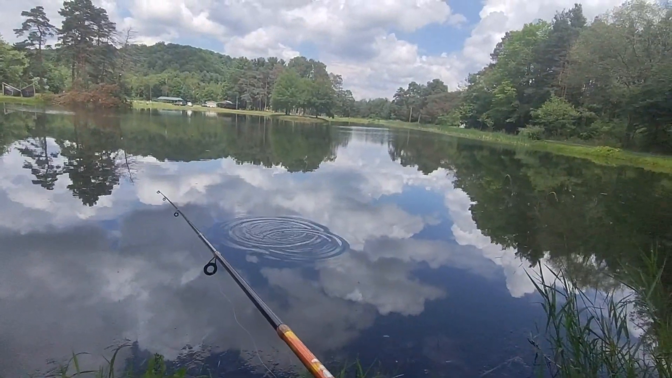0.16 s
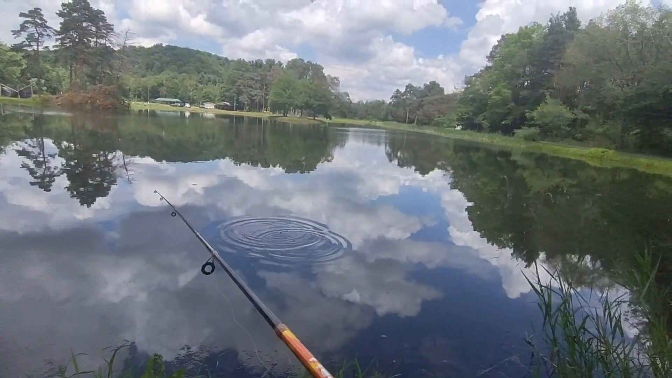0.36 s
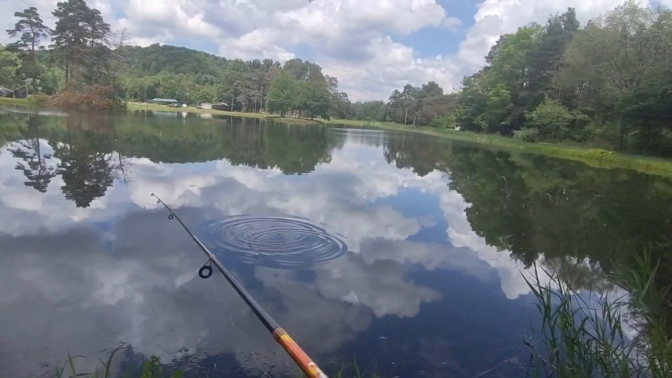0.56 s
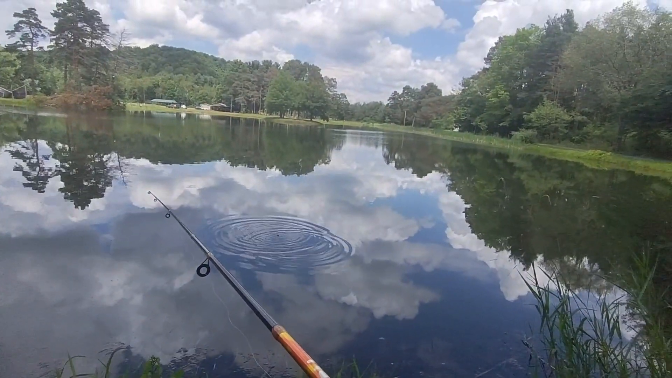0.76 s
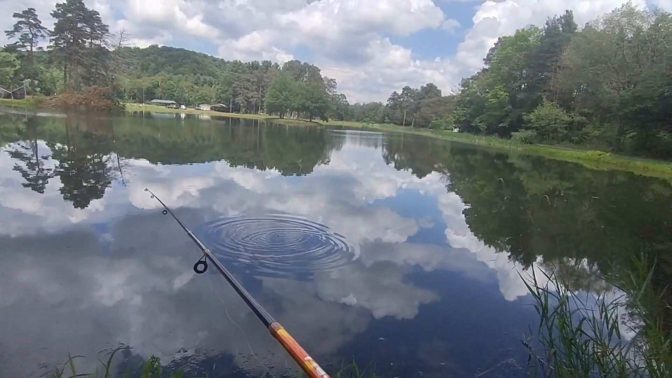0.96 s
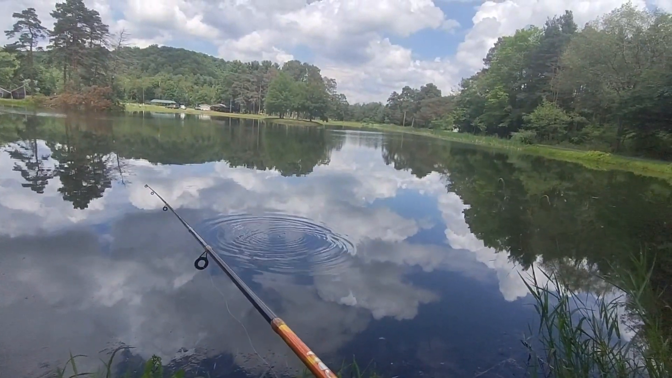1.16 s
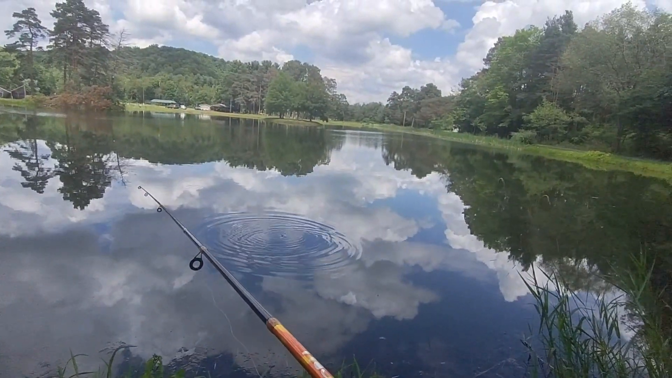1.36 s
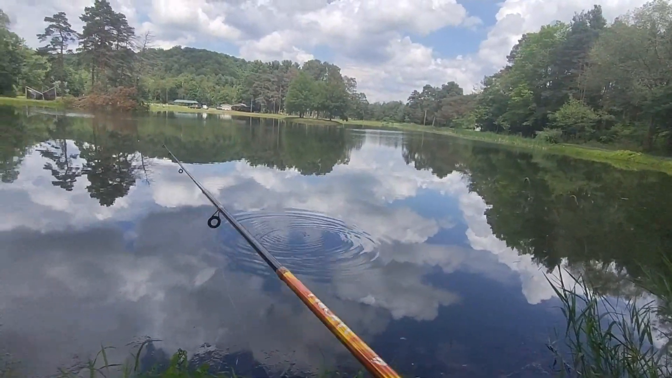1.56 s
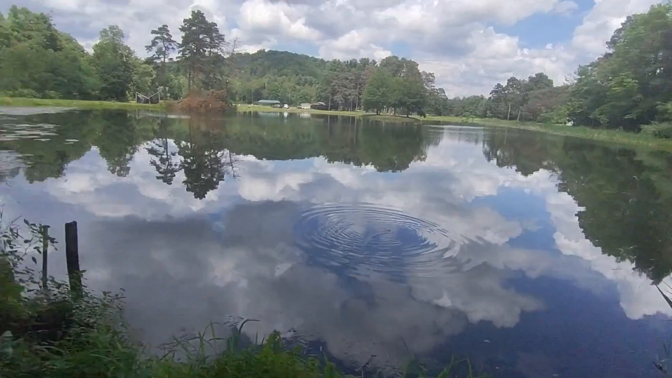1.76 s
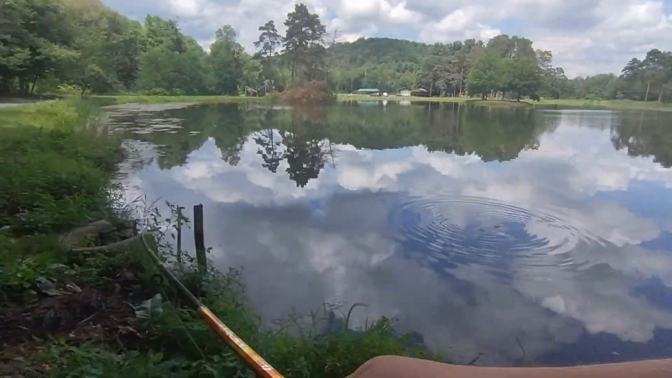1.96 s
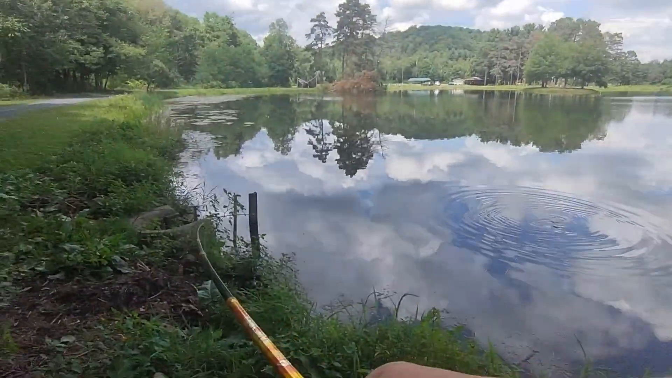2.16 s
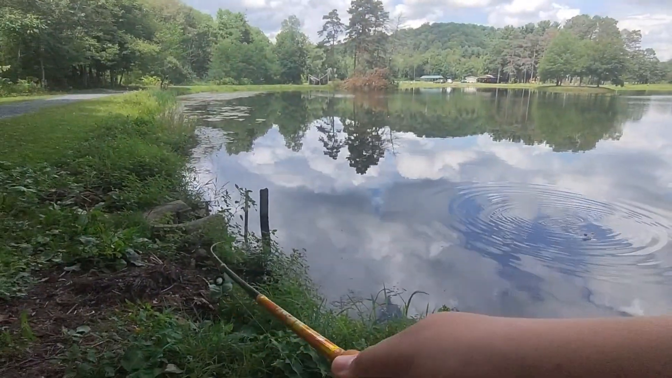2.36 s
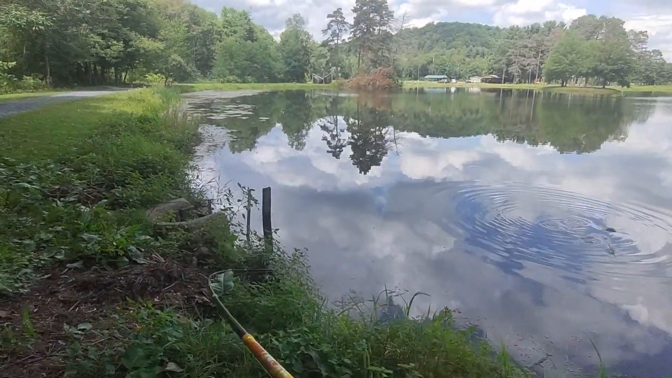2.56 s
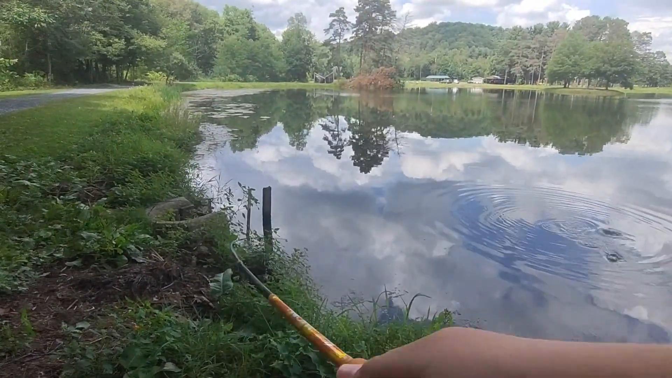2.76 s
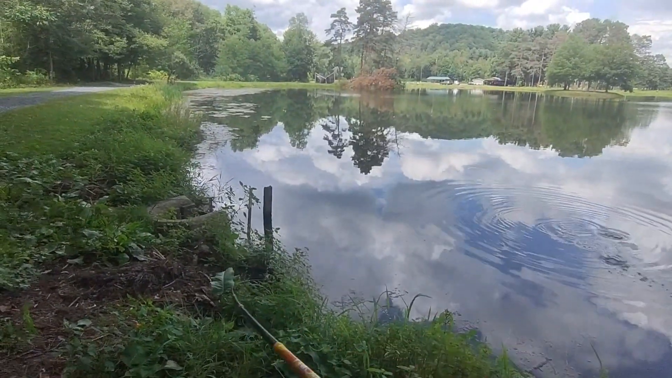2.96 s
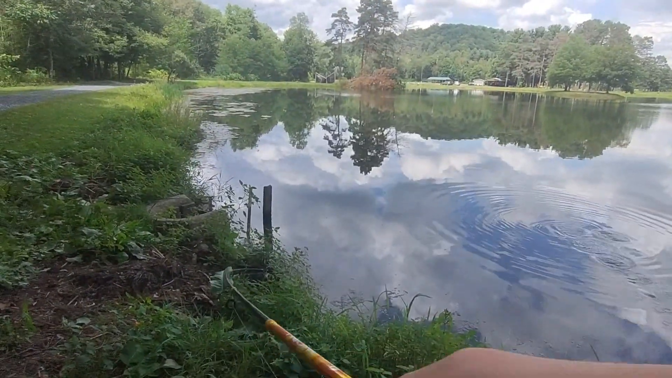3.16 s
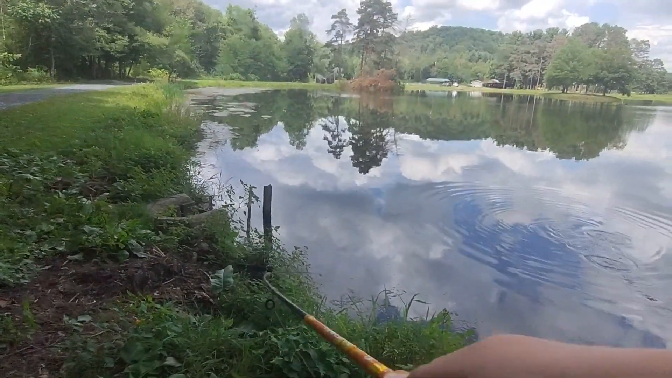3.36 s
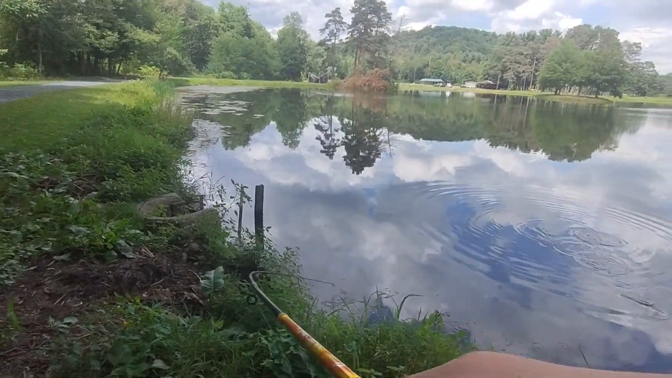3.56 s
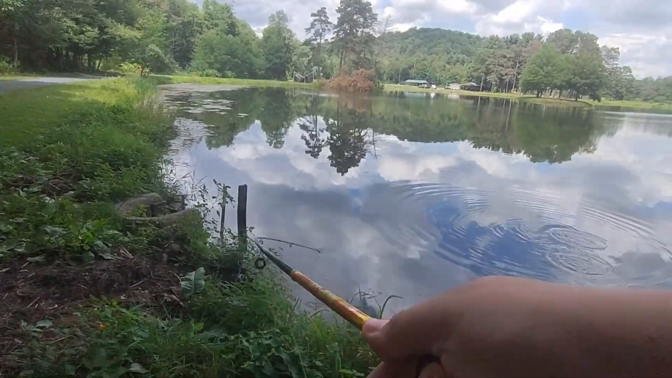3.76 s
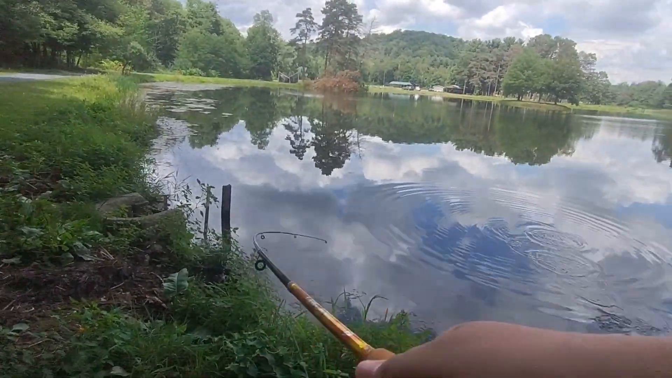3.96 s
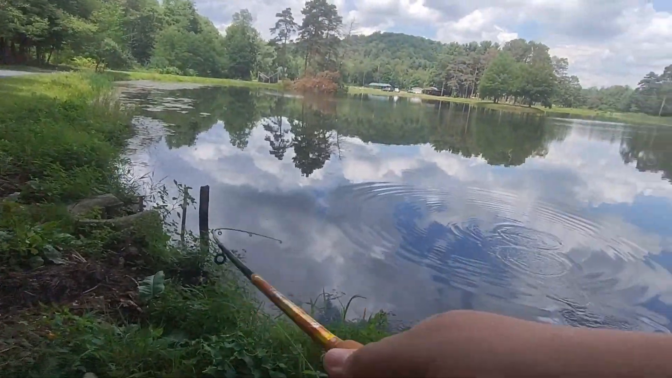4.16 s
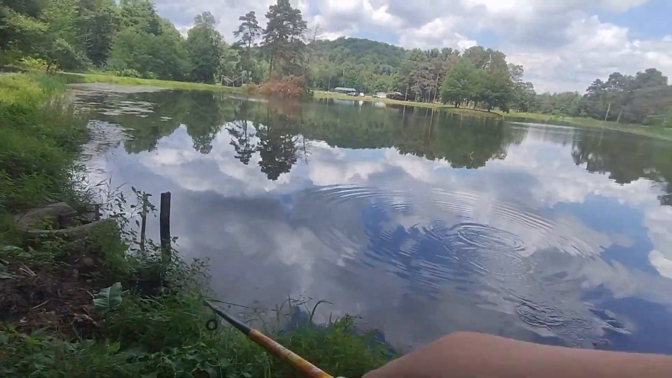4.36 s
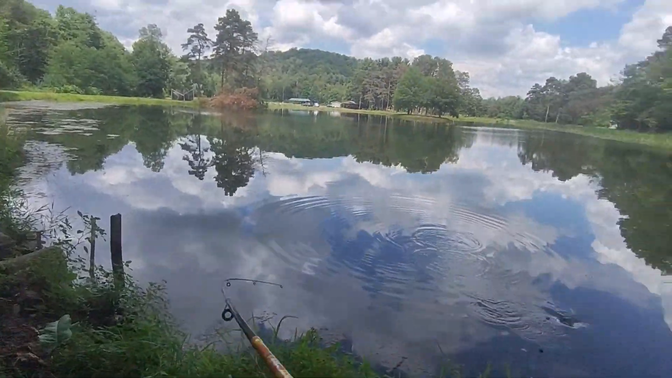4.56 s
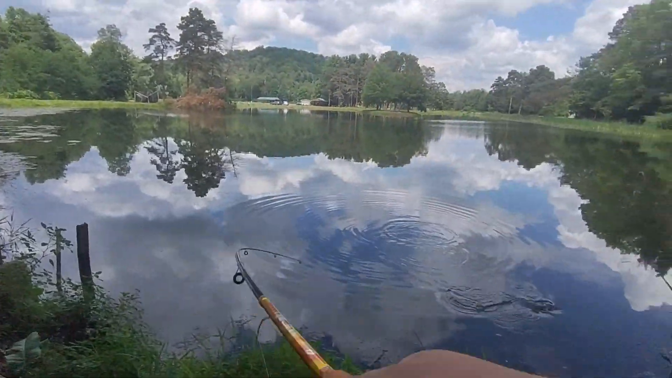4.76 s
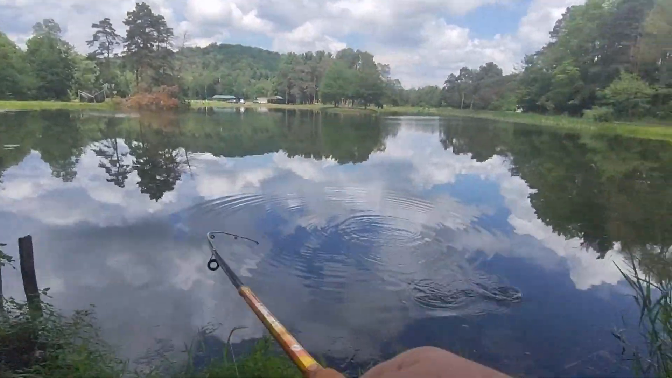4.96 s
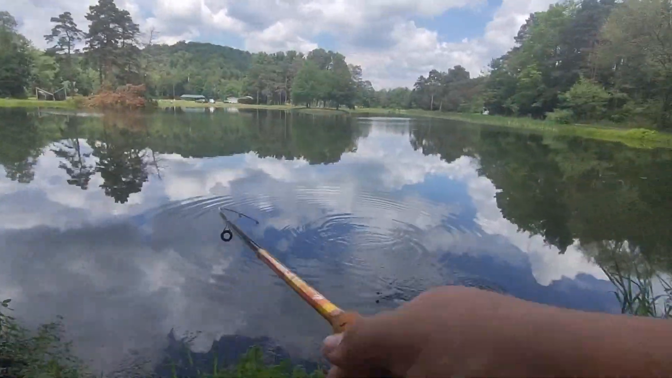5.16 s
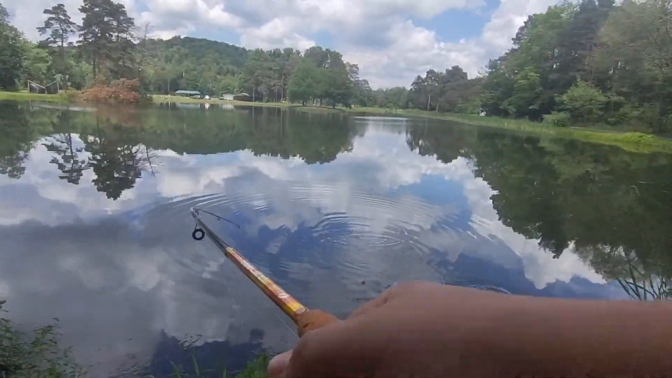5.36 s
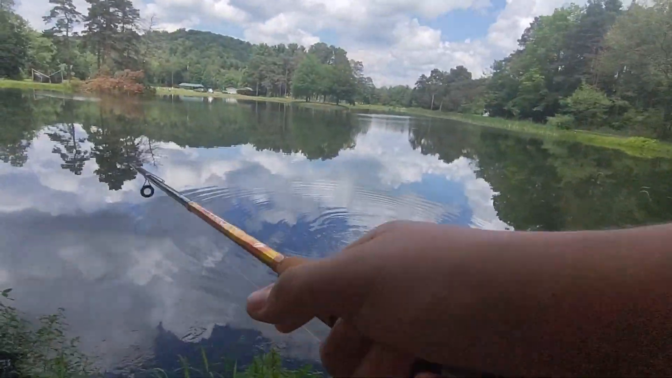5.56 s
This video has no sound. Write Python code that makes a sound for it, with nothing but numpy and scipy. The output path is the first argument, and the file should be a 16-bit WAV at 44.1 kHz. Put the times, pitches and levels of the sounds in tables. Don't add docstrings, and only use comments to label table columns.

```python
import sys
import numpy as np
from scipy import signal
from scipy.fft import rfft, irfft, next_fast_len
from scipy.io import wavfile
from scipy.ndimage import uniform_filter1d, map_coordinates

SR = 44100
rng = np.random.default_rng(int(sys.argv[2]) if len(sys.argv) > 2 else 0)


def undo_db(level):
    steps = np.asarray(level, float) / 20
    return 10 ** steps


def put_to_file(sound):
    columns = np.atleast_2d(sound).T
    safe = np.clip(columns, -1, 1)
    whole_steps = np.round(safe * 32767)
    wavfile.write(sys.argv[1], SR, whole_steps.astype(np.int16))


N = 247401
T = np.arange(N) / SR


def unit(x):
    return x / np.sqrt(np.mean(x ** 2) + 1e-20)


def along(points, hz):
    f, v = np.transpose(points)
    return np.interp(np.log(hz + 1), np.log(f + 1), v)


def spectrum(points):
    return lambda hz: undo_db(along(points, hz))


def over_time(points):
    s, value = np.transpose(points)
    return np.interp(T, s, value)


def wobble(rate):
    coarse = T[::int(SR / rate / 40) + 1]
    knots = rng.standard_normal(int(N * rate / SR) + 4)
    return np.interp(T, coarse, map_coordinates(knots, [coarse * rate]))


def filtered(x, response):
    m = next_fast_len(x.shape[-1] + 2048)
    return irfft(rfft(x, m) * response(np.fft.rfftfreq(m, 1 / SR)), m)[..., :x.shape[-1]]


def modes(table):
    def response(f):
        total = 0
        for k, (c, w, db) in enumerate(table):
            total = total + (-1) ** k * undo_db(db) * 1j * f * w / (c * c - f * f + 1j * f * w)
        return total
    return response


def ports(pair):
    # pitch_hz, level_db
    left_over_right = [(60, 0), (99, -5), (160, -6), (270, -2.5), (450, -2), (740, 0), (1220, -0.5),
                       (2010, 0.5), (3330, -1), (5500, 0), (9080, 22.5), (15000, 13.5)]
    # pitch_hz, likeness (-1 to 1)
    likeness = [(60, 0.38), (180, 0.82), (550, 0.17), (1650, -0.099), (4970, -0.061), (15000, 0.33)]
    turn = lambda hz: np.arccos(np.clip(along(likeness, hz), -1, 1)) / 2
    mid, side = filtered(pair, lambda hz: np.array([np.cos(turn(hz)), np.sin(turn(hz))]))
    share = lambda hz: 1 / np.sqrt(1 + undo_db(np.array([[-2], [2]]) * along(left_over_right, hz)))
    both = filtered(np.array([mid + side, mid - side]), share)
    return both / np.std(both.mean(0))


def rush(response, patchy_db, grain_db=0.0):
    noise = rng.standard_normal((2, N)) * undo_db(grain_db * wobble(350))
    z = signal.stft(noise, nperseg=512)[2]
    field = uniform_filter1d(rng.standard_normal(z.shape[1:]), 5, 0)
    field = uniform_filter1d(field, 9, 1)
    patchy = signal.istft(z * undo_db(patchy_db * unit(field)), nperseg=512)[1][:, :N]
    return ports(filtered(patchy, response))


def place(starts, rows):
    at = np.round(starts * SR).astype(int)[:, None] + np.arange(rows.shape[1])
    return np.bincount(at.ravel(), rows.ravel(), N + SR)[:N]


def strokes(rows):
    s, length, db = np.transpose(rows)[:, :, None]
    return (undo_db(db) * np.exp(-np.abs((T - s) / (0.5 * length)) ** 1.37)).sum(0)


def distant_air():
    # pitch_hz, level_db (per Hz)
    air_tone = [(15, -47), (25, -42), (65, -9.5), (210, -7.5), (251, -8.5), (695, -14.5), (777, -10),
                (991, -15.5), (1210, -15), (2150, -10), (2690, -15.5), (3590, -7), (5000, -13.5),
                (6500, -20), (11000, -120)]
    # pitch_hz, width_hz, level_db
    engine = [(68.8, 7.2, 0)]
    # time_s, level_db
    air_level = [
        (0.0, -75.5),
        (1.64, -75),
        (2.22, -67),
        (3.23, -64.5),
        (4.3, -68.5),
        (5.34, -76),
        (5.61, -62),
    ]
    air = rush(spectrum(air_tone), patchy_db=1.5)
    air = air + undo_db(-11.0) * rush(modes(engine), patchy_db=2.5)
    return undo_db(over_time(air_level) + 9.5) * air


def overtones(turn):
    # middle_s, length_s, overtone (number), level_db
    gaps = [(1.75, .55, 46, -57), (2.5, .12, 37, -46), (2.45, .3, 42, -50), (2.25, .3, 46, -50),
            (2.78, .25, 44, -48), (3.02, .85, 42, -41), (2.95, .7, 38, -49), (3.12, .35, 37, -51),
            (3.12, .35, 40, -51), (3.15, .45, 48, -54), (3.68, .3, 43, -48), (3.7, .4, 42, -51),
            (3.7, .3, 40, -52), (4.2, .5, 44, -42), (4.1, .25, 47, -44), (4.13, .35, 40, -48),
            (4.15, .4, 42, -50), (4.15, .35, 38, -54), (4.82, .42, 35, -48), (4.85, .4, 36, -50),
            (4.78, .45, 38, -48), (4.8, .4, 40, -52), (4.78, .45, 44, -48), (4.75, .4, 47, -54),
            (4.8, .4, 34, -53), (5.21, .24, 42, -39), (5.2, .22, 44, -46), (5.2, .2, 41, -50),
            (5.44, .3, 41, -42), (5.5, .3, 42, -44), (5.45, .3, 44, -49), (5.3, .5, 43, -51)]
    right_db = -19.5
    out, flicker = np.zeros(N), wobble(12)
    for s, length, order, db in gaps:
        span = slice(int((s - length) * SR), int((s + length) * SR))
        swell = np.exp(-np.abs(2 * (T[span] - s) / length) ** 4)
        gain = undo_db(db + 3 + 1.5 * np.roll(flicker, rng.integers(N))[span])
        out[span] += swell * gain * np.cos(order * turn[span] + rng.uniform(0, 2 * np.pi))
    return out * undo_db([[0], [right_db]])


def far_chorus():
    # time_s, level_db
    chorus_level = [(0.0, -46), (0.6, -47), (1.6, -45.5), (2.4, -44), (2.7, -46.5), (4.5, -43.5),
                    (5.61, -44.5)]
    # pitch_hz, level_db (per Hz)
    chorus_tone = [(2650, -49), (4500, -23), (5660, -23), (6250, -12.5), (7240, -9), (8260, -3.5),
                   (8760, -6), (8890, -11), (10500, -20), (12100, -30.5), (13700, -21.5), (14500, -71)]
    hiss = rush(spectrum(chorus_tone), patchy_db=.7) * undo_db(1.1 * wobble(11))
    return undo_db(over_time(chorus_level) - 3.0) * hiss


def throbber():
    # time_s, level_db
    throb_level = [(0, -54), (.4, -54), (.8, -51), (1.5, -47.5), (1.9, -49), (2.4, -53), (5.61, -55)]
    # pitch_hz, width_hz, level_db
    wing_early = [(8030, 110, 0), (7180, 90, -6), (8500, 160, -6), (8850, 300, -7)]
    # pitch_hz, width_hz, level_db
    wing_later = [(8470, 90, 0), (8295, 110, -4), (7610, 130, -4), (8020, 200, -10)]
    stroke_hz, change_s, change_length_s = 51.62, .35, .7
    scrape = (.5 + .5 * np.cos(2 * np.pi * stroke_hz * T + 0.2 * wobble(1.1))) ** 1.3
    beat = np.diff(np.floor(stroke_hz * T + .1 + 3e-4 * wobble(3)), prepend=0) * undo_db(2 * wobble(20))
    files = rng.standard_normal((2, N)) * scrape + unit(beat) * [[1], [-1]]
    changed = np.clip((T - change_s) / change_length_s, 0, 1)
    before = unit(filtered(files, lambda hz: modes(wing_early)(hz) ** 2))
    after = unit(filtered(files, lambda hz: modes(wing_later)(hz) ** 2))
    throb = ports((1 - changed) * before + changed * after) * undo_db(0.63 * wobble(19.0))
    return undo_db(over_time(throb_level)) * throb


def buzzer():
    # time_s, level_db
    buzz_level = [(0, -75), (1.9, -70), (2.35, -49), (3.0, -44), (3.7, -44), (4.2, -43), (4.8, -43),
                  (5.61, -44)]
    # time_s, rate_hz
    buzz_rate = [(0, 201.25), (5.61, 205.23)]
    # pitch_hz, width_hz, level_db
    click_ring = [(6850, 770, -10), (7650, 530, -5), (8580, 500, -3), (9760, 460, -6.5), (10160, 280, -11)]
    # pitch_hz, width_hz, level_db
    rasp_ring = [(9570, 280, 0), (9950, 1200, -20), (7200, 930, 5)]
    turn = 2 * np.pi * np.cumsum(over_time(buzz_rate)) / SR
    clicks = np.zeros((2, N))
    for order in range(32, 52):
        fading = undo_db(4.5 * np.array([wobble(6), wobble(6)]))
        clicks += fading * np.cos(order * turn + rng.normal(0, 1.0, (2, 1)))
    rasp = rng.standard_normal((2, N)) * (1 + np.cos(2 * turn)) ** 1.1
    buzz = undo_db(-4) * ports(filtered(clicks, modes(click_ring)))
    buzz = buzz + undo_db(-7) * ports(filtered(rasp, modes(rasp_ring)))
    return undo_db(over_time(buzz_level)) * buzz + overtones(turn)


def handling():
    # middle_s, length_s, level_db (of the sleeve)
    arm_moves = [(2.03, 0.052, -47.5), (2.07, 0.012, -34.5), (2.27, 0.088, -50), (2.71, 0.21, -48.5),
                 (3.13, 0.085, -50), (3.3, 0.07, -57.5), (3.55, 0.17, -68), (3.82, 0.16, -54.5),
                 (4.05, 0.14, -60.5), (4.45, 0.15, -59), (4.6, 0.013, -55.5), (4.77, 0.18, -51.5),
                 (5.09, 0.076, -52), (5.45, 0.076, -50)]
    # middle_s, length_s, level_db
    line_slides = [(2.07, 0.0087, -54), (2.43, 0.066, -48.5), (2.7, 0.55, -65), (3.0, 0.16, -53),
                   (3.13, 0.063, -63), (3.31, 0.18, -50), (3.66, 0.11, -51.5), (3.8, 0.14, -46),
                   (3.985, 0.024, -43), (4.07, 0.083, -48), (4.25, 0.26, -56.5), (4.6, 0.0057, -51),
                   (4.7, 0.38, -63.5), (5.5, 0.31, -63)]
    # pitch_hz, level_db (per Hz)
    rub_tone = [(71, -86), (120, -0.5), (280, -1.5), (552, -12.5), (774, -2), (1300, -5), (1690, -5.5),
                (2860, -120)]
    # pitch_hz, width_hz, level_db
    sleeve_ring = [(1430, 2100, -22.5), (1810, 240, -5), (2528, 390, -4.5)]
    # pitch_hz, width_hz, level_db
    line_ring = [(3480, 480, 3), (4300, 800, -1)]
    # pitch_hz, level_db (per Hz)
    grass_tone = [(4500, -6.5), (6000, 3.5), (9000, 8), (11000, -5), (14200, -19), (15000, -41)]
    start = np.clip((T - 1.75) / 0.19, 0, 1) ** 1.43
    arm, line = strokes(arm_moves), strokes(line_slides)
    rub = undo_db(-61.5) + undo_db(-6.5) * arm
    rub = rub * rush(spectrum(rub_tone), patchy_db=2.5, grain_db=1.0)
    sleeve = (undo_db(-60.5) + arm) * rush(modes(sleeve_ring), patchy_db=3.5, grain_db=1.0)
    rings = undo_db(-63) + line
    rings = rings * rush(lambda hz: modes(line_ring)(hz) ** 2, patchy_db=2.5, grain_db=2.5)
    grass = (undo_db(-57.5) + undo_db(-10.5) * arm) * undo_db(9.5)
    grass = grass * rush(spectrum(grass_tone), patchy_db=3.5, grain_db=1.5)
    return start * (rub + sleeve + rings + grass)


def blows(table, attack, noisy, thud, reach):
    s, db, hz, pan_db, t60 = np.transpose(table)[:, :, None]
    t = np.arange(3000) / SR

    def around_pitch(f):
        bell = f * hz / (f * f + hz * hz)
        return bell / (1 + (f / (reach * hz)) ** 4) * (f > .5 * hz)

    hiss = filtered(rng.standard_normal((len(s), len(t))), around_pitch)
    tone = sum(g * np.sin(2 * np.pi * k * hz * t) for k, g in [(.45, thud), (1, 0.87), (1.7, 0.22)])
    ring = tone + noisy * hiss / hiss.std(1, keepdims=True)
    ring = ring * undo_db(-60 * t / t60) * (1 - np.exp(-t / attack))
    ring = ring / np.abs(ring).max(1, keepdims=True)
    return np.array([place(s[:, 0], ring * undo_db(db + side * pan_db / 2)) for side in (1, -1)])


def rod():
    knocks = [(0.975, -54.5, 600, -13, 0.055), (1.059, -58, 692, -11.5, 0.11),
              (1.104, -49.5, 465, -13, 0.082), (1.799, -39, 365, -4.5, 0.02), (2.072, -42, 386, -11, 0.061),
              (1.8, -52, 170, -4, 0.074), (2.106, -47, 1050, -5, 0.014), (2.198, -46.5, 172, -3, 0.046),
              (2.995, -36, 874, 2, 0.017), (2.997, -47, 585, 4, 0.022), (3.11, -43, 820, -5, 0.046),
              (5.073, -36.5, 1148, 0, 0.05), (5.044, -37, 692, 2, 0.057), (5.066, -34, 386, 0, 0.075),
              (5.079, -42.5, 357, -5, 0.12), (5.091, -42, 438, 4, 0.055), (5.094, -40.5, 1074, 2, 0.052),
              (5.119, -44, 678, 1, 0.084), (5.289, -40.5, 975, 9, 0.0075), (5.488, -44, 210, -10, 0.019),
              (2.412, -37, 4300, 0, 0.09), (2.428, -34, 5600, 0, 0.09), (2.434, -29, 7200, 11, 0.03)]
    # start_s, level_db (peak), pitch_hz, left_over_right_db, fade_s (to -60 dB)
    snaps = [(2.0672, -14.5, 5970, -2, 0.021), (2.125, -34.5, 1170, -4, 0.01),
             (2.197, -31, 2740, 11, 0.0073), (2.0667, -23, 2700, -25, 0.0048), (2.397, -33, 4500, 0, 0.006),
             (2.6187, -24.5, 4560, 7, 0.0071), (3.3124, -27, 4400, -2.5, 0.012),
             (3.5673, -28, 3760, -9, 0.02), (4.6005, -26, 3000, 6, 0.006), (4.605, -33, 3500, 0, 0.02),
             (5.0685, -37, 2500, 0, 0.008), (5.5653, -33.5, 3980, 22, 0.0046)]
    dull = blows(knocks, attack=.0035, noisy=.45, thud=.15, reach=1.3)
    return dull + blows(snaps, attack=.0006, noisy=1.2, thud=.15, reach=3.2)


def bird():
    # time_s, level_db (peak), pitch_hz, left_over_right_db, length_ms
    chips = [
        (1.923, -55, 5470, -22, 9.2),
        (2.3, -30, 5230, -5, 4.8),
        (2.801, -18, 5504, 11.5, 7.8),
        (3.6621, -35.5, 5680, 9, 6.7),
        (3.8121, -15, 6075, 11, 4.5),
        (4.871, -37, 5950, 8, 4.3),
    ]
    s, db, hz, pan_db, ms = np.transpose(chips)[:, :, None]
    octave_db = -40 + 3.5 * ms
    lead = 500
    t = (np.arange(2 * lead) - lead) / SR
    turn = 2 * np.pi * hz * (t + 1.2 * t ** 2)
    swell = np.exp(-np.abs(t / (ms / 1700)) ** 2.0)
    out = []
    for side in (1, -1):
        octave = undo_db(octave_db + 8 * side - 8) * swell ** 2 * np.sin(2 * turn)
        note = swell * np.sin(turn) + octave
        out.append(place(s[:, 0] + 0.0027 - lead / SR, note * undo_db(db + 0.5 + side * pan_db / 2)))
    return np.array(out)


def teeth():
    # start_s, spring_db, pawl_db, spool_db, length_ms; the last holds further teeth, some weak, some
    # quick doubles of a tooth (the faint one at 5.092 s is a rustle of grass)
    first = [(2.054, -16, -13, -31.0, 3.4), (2.0667, -20, -4.5, -14.5, 5.3), (2.074, -27, -21, -23, 3.9),
             (2.0863, -20, -32, -35, 2.9), (2.1052, -16, -19, -28.5, 1.8), (2.116, -16.5, -29, -28, 3.1),
             (2.128, -17, -25, -36, 3.7), (2.139, -8, -19, -31.0, 2.4), (2.148, -19, -20.0, -31, 2.3),
             (2.1607, -14, -22, -34, 3.1), (2.5574, -22, -14, -45, 5.0), (2.5606, -5.5, -3, -38, 2.6),
             (2.569, -6, -10, -22, 3.4), (2.5776, -22.0, -9, -22.5, 3.8), (2.5865, -21.0, -9, -22, 3.6),
             (2.5955, -9, -15, -19, 3.3), (2.6068, -19, -13, -24, 6.9), (2.6193, -10.5, -13, -22, 2.8),
             (2.9512, -42, -20.5, -44, 4.4), (2.955, -39, -22, -47, 5.9), (3.2857, -25, -22, -39.0, 2.2),
             (3.3129, -10, -7.5, -37, 1.9), (3.3384, -30, -22.5, -37, 5.0)]
    middle = [(3.417, -12, -10.5, -31.0, 2.8), (3.428, -6, -11.5, -29, 2.5), (3.439, -8, -10.5, -23.5, 3.6),
              (3.45, -9, -17, -27, 2.7), (3.461, -16.0, -12.0, -26, 2.5), (3.4714, -10, -17, -27, 5.1),
              (3.4812, -6, -11.5, -25, 2.4), (3.491, -8, -6, -25, 2.3), (3.501, -2, -15, -25, 2.7),
              (3.5104, -12, -12.5, -27, 2.8), (3.519, -18.0, -14.5, -28, 7.8), (3.53, -17.0, -18, -23, 4.3),
              (3.5394, -5.5, -14.5, -24, 2.6), (3.55, -18, -12.5, -22, 2.6), (3.5605, -10, -10, -23.5, 2.5),
              (3.568, -12, -5.5, -21, 1.6), (3.7617, -17, -29, -36.5, 4.9), (3.7726, -17, -20, -31, 4.4),
              (3.7778, -29, -28, -38.0, 5.0), (3.7847, -12.5, -19, -33, 4.9), (3.8012, -16, -18, -26, 4.6),
              (3.8195, -5, -15, -22, 3.3), (3.838, -10, -15, -26.5, 2.6), (3.8617, -21, -32, -32, 5.0),
              (3.866, -14, -19, -29.5, 5.5), (3.8825, -8.5, -12.5, -26, 1.8), (3.8932, -2, -8.5, -24, 1.6),
              (3.9014, -6, -14, -23.5, 3), (3.909, -3.5, -14, -22, 2.4), (3.9267, -9, -17.5, -31, 2.7),
              (3.958, -12, -13, -33, 1.8), (3.9665, -13, -16, -25, 2.7), (3.979, -12, -18, -25.5, 1.9),
              (4.0187, -7, -16.5, -28, 3.8)]
    last = [(4.2338, -41.0, -21.5, -42, 2.5), (4.286, -30.0, -14.5, -41, 4.4), (4.2918, -24, -21, -44, 5),
            (4.3272, -15, -20, -29, 6), (4.3355, -12, -11.5, -26, 3.0), (4.343, -5, -13, -21, 3.2),
            (4.346, -20.0, -23, -35, 5.0), (4.3513, -10, -10, -25, 3.6), (4.359, -7, -11, -23, 3.5),
            (4.367, -13, -10.5, -22, 2.9), (4.375, -17.0, -11, -20.5, 9.3), (4.3833, -11.5, -13, -24, 6.1),
            (4.3925, -16, -17, -23.0, 7.3), (4.4, -7, -15, -23.0, 6.6), (4.409, -19, -15, -25, 7.5),
            (4.418, -13, -14, -20.5, 5.3), (4.426, -9, -11.5, -24, 4.5), (4.4357, -18, -14, -29, 4.6),
            (4.4396, -35.5, -23, -36.0, 3.9), (4.4454, -7, -11, -32, 6.1), (4.4545, -5, -14, -24, 3.5),
            (4.4649, -7, -12, -29, 3.9), (4.4756, -9, -14, -27, 4.9), (4.487, -12, -14.5, -25, 2.9),
            (4.4984, -11, -16.5, -23.5, 5.9), (4.51, -15, -12.5, -23, 2.5), (4.523, -11, -14, -32.0, 3.8),
            (4.53, -14, -18, -35, 3.7), (4.536, -11, -13, -26, 3.4), (4.5403, -28.0, -25, -38.0, 5.0),
            (4.5495, -10, -10, -26, 1.6), (4.5638, -13, -18, -29, 6.3), (4.58, -13, -10, -32, 1.8),
            (4.601, -10, -7.5, -26.5, 2), (5.02, -7.5, -13, -44, 2.5), (5.05, -3, -7, -28, 1.6),
            (5.566, -12.5, -13, -32, 2.2)]
    more_teeth = [(2.169, -32, -26, -36, 4), (2.19, -31, -26, -46, 13), (3.4104, -30, -22, -40, 1.5),
                  (3.5624, -13, -21, -28, 1.8), (4.5138, -20, -17, -30, 2), (4.6025, -24, -12.5, -30, 2.5),
                  (5.0175, -26, -20, -44, 4), (5.092, -31, -22.5, -38, 9), (2.211, -39, -22, -50, 4),
                  (2.389, -30, -26, -45, 2.5), (3.951, -32, -21, -30, 1.5), (4.9334, -34, -35, -48, 5)]
    return np.transpose(first + middle + last + more_teeth)


def clicker():
    # pitch_hz, width_hz, level_db
    spring = [(10450, 570, -4), (11930, 560, -3.5), (12200, 590, -6), (13600, 1170, -10.5)]
    # pitch_hz, width_hz, level_db
    pawl = [(9080, 600, 0), (8200, 600, -6)]
    # pitch_hz, width_hz, level_db
    spool = [(5660, 340, 6), (7630, 280, 2)]
    # pitch_hz, width_hz, level_db
    crack = [(5970, 4300, 2), (14300, 830, -28)]
    s, spring_db, pawl_db, spool_db, ms = teeth()
    lead = 200
    t = (np.arange(900) - lead) / SR
    life = ms[:, None] / 1000
    scrape = np.exp(-np.abs(t / (.33 * life)) ** 1.3)
    rattle = .96 * np.exp(-np.abs(t / (.3 * life)) ** 1.3) + 0.04 * np.exp(-t / 0.008)
    shape = np.where(t < 0, scrape, rattle)
    bounce_s, bounce_db = .0018, -10 + rng.normal(0, 3.8, life.shape)
    shape = shape + undo_db(bounce_db) * np.exp(-((t - bounce_s) / (0.18 * life)) ** 2)
    detune = np.exp(rng.normal(0, 0.012, (len(s), 1)))
    band = lambda hz: hz ** 4 / (hz ** 4 + 4500 ** 4) / (1 + (hz / 14700) ** 24)
    sharp = lambda ring: ring * abs(ring) ** .5

    def part(table, db, late, bend=1):
        strike = (rng.standard_normal((len(s), len(t))) + 2.7 * (t == 0)) * shape
        rows = filtered(strike, lambda hz: sharp(modes(table)(hz * detune ** bend)) * band(hz))
        rows = rows / np.abs(rows).max(1, keepdims=True) * undo_db(db)[:, None]
        return place(s - lead / SR + late, rows)

    left = part(spring, spring_db - 5.0, late=-0.0004) + part(pawl, pawl_db + 0.5, late=-0.0004)
    left = left + part(spool, spool_db - 4.5, late=.0003, bend=.15)
    left = left + part(crack, pawl_db - 11, late=-0.00023)
    right = part(pawl, pawl_db - 25.0, late=0.000081) + part(spring, spring_db - 25.5, late=0.00045)
    right = right + part(spool, spool_db + 1.5, late=.0007, bend=0.25)
    tail = rng.standard_normal((2, 1800)) * undo_db(-60 * np.arange(1800) / SR / .045)
    wet = signal.fftconvolve(left[None], tail / np.linalg.norm(tail[0]), axes=1)[:, :N]
    wet[1] = filtered(wet[1], lambda hz: 1 / (1 + (hz / 9000) ** 4))
    return np.array([left, right]) + undo_db([[-12.5], [-13]]) * wet


def scene():
    insects = far_chorus() + throbber() + buzzer()
    return distant_air() + insects + handling() + rod() + bird() + clicker()


def starved(x, depth_db, follow):
    # pitch_hz, level_db (added to the bar)
    neglect = [(500, -40), (700, 0), (2100, 3), (2900, 8), (3300, 3), (3900, 7), (4400, 8), (4700, 6),
               (5250, 10), (6000, 0), (9000, 3), (11800, 3), (13000, -2), (14000, -7), (14300, 14),
               (14700, 10)]
    # pitch_hz, level_db
    still_habit = [(2400, 0), (2600, -1), (2990, 6), (3200, 0), (3950, -3), (4240, 6), (4550, -3),
                   (5000, 0)]
    hz, _, z = signal.stft(x, SR, nperseg=2048, noverlap=1024)
    band = np.searchsorted(np.r_[np.geomspace(600, 6000, 34), np.arange(6350, 22100, 345)], hz)
    edges = np.r_[0, np.flatnonzero(np.diff(band)) + 1]
    power = np.add.reduceat(abs(z) ** 2, edges, 1) / np.bincount(band)[:, None]
    level = 10 * np.log10(power + 1e-20)
    loudest = level.max((0, 1))
    bar = follow * loudest + (1 - follow) * np.median(loudest) - depth_db
    bar = bar + uniform_filter1d(rng.normal(0, 6.0, level.shape), size=2, axis=2)
    busy = uniform_filter1d(level[:, 8:28].mean((0, 1)), size=21)
    bar = bar + .55 * (busy - np.percentile(busy, 15)) * (hz[edges, None] < 4600)
    still = busy < np.percentile(busy, 30)
    bar = bar + along(neglect, hz[edges])[:, None]
    bar = bar + along(still_habit, hz[edges])[:, None] * still
    return signal.istft(z * (level > bar)[:, band], SR, nperseg=2048, noverlap=1024)[1][:, :N]


def trimmed(x, edge_hz, open_db):
    top = filtered(x, lambda hz: 1 / (1 + (edge_hz / (hz + 1)) ** 80))
    loud = uniform_filter1d(top ** 2, size=100, axis=1) > undo_db(2 * open_db)
    return x - top * (1 - uniform_filter1d(loud * 1.0, size=100, axis=1))


def top_cut(x):
    return signal.sosfilt(signal.butter(12, 15800, fs=SR, output="sos"), x)


def record(dry):
    soft = dry / (1 + abs(dry / .85) ** 6) ** (1 / 6)
    return top_cut(soft)


dry = scene()
out = record(dry)
put_to_file(out)
```